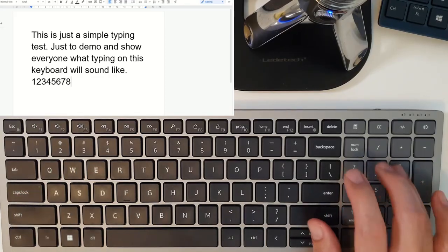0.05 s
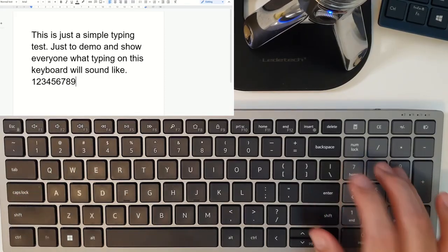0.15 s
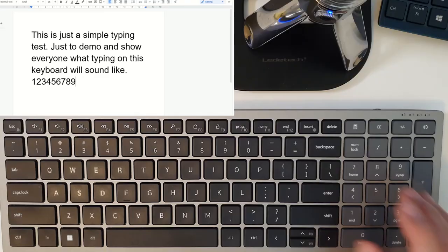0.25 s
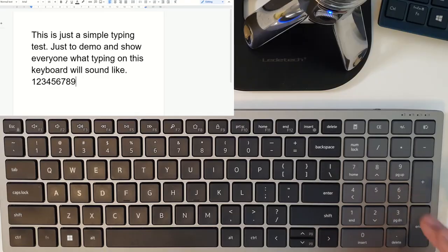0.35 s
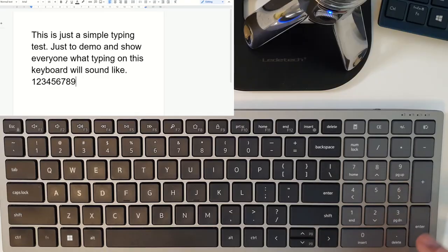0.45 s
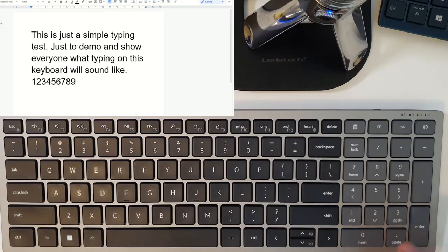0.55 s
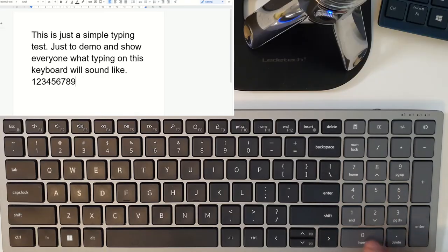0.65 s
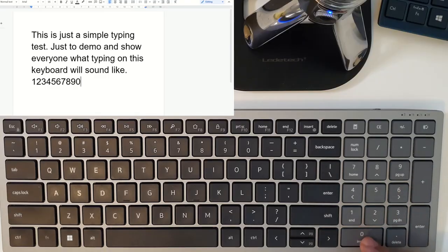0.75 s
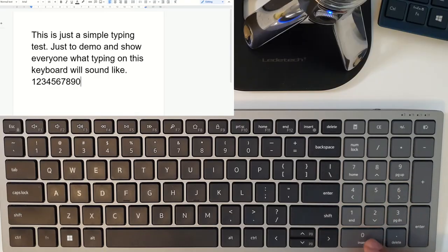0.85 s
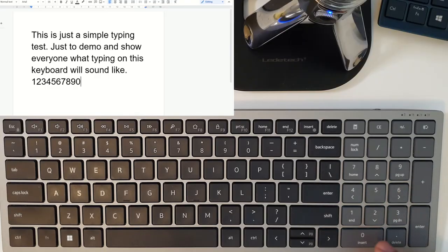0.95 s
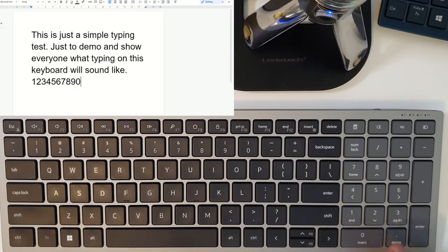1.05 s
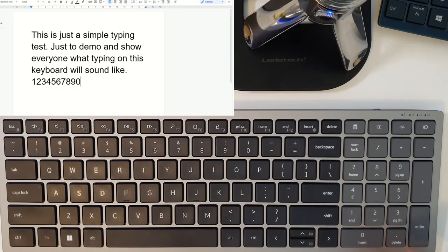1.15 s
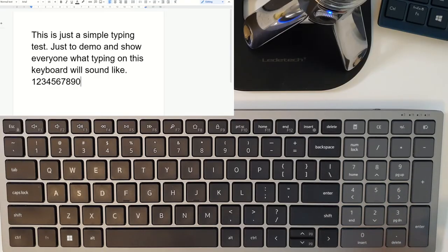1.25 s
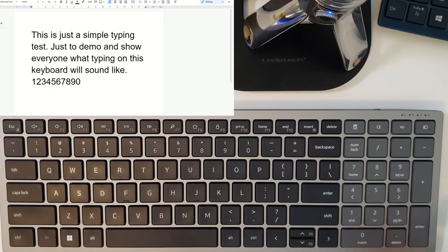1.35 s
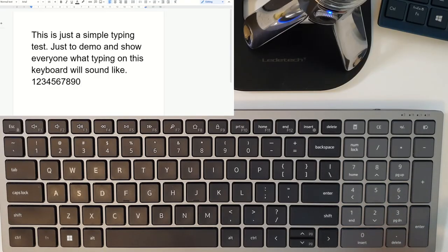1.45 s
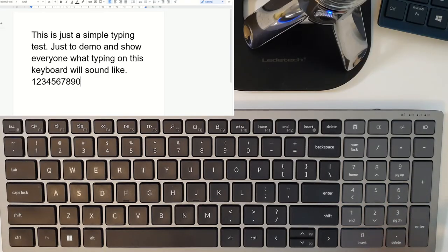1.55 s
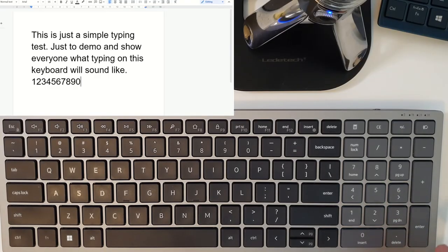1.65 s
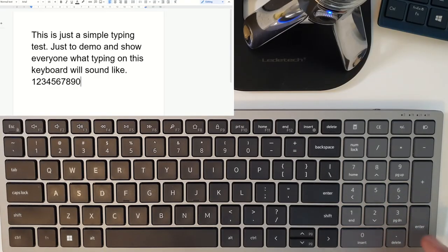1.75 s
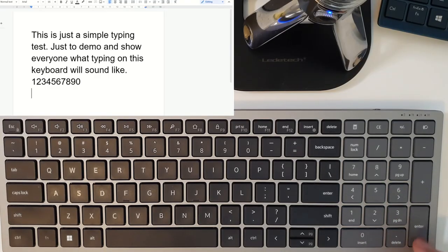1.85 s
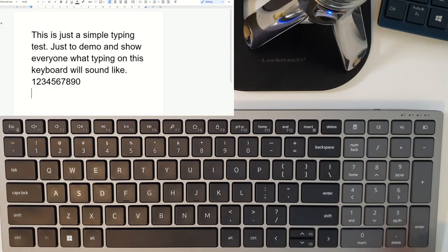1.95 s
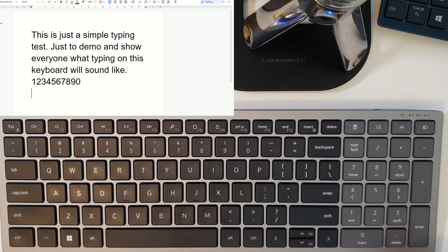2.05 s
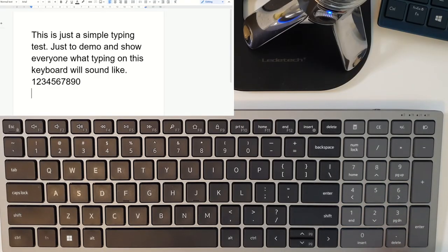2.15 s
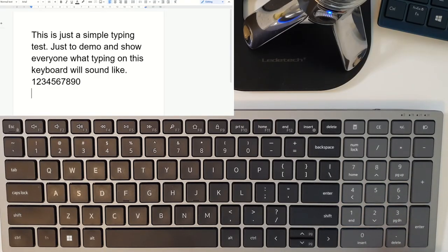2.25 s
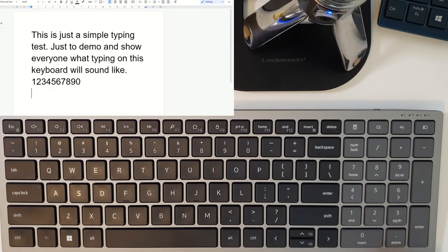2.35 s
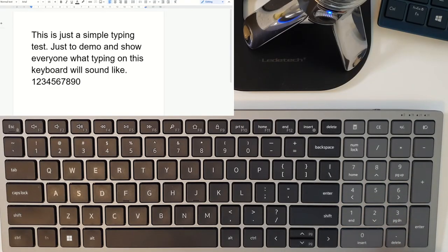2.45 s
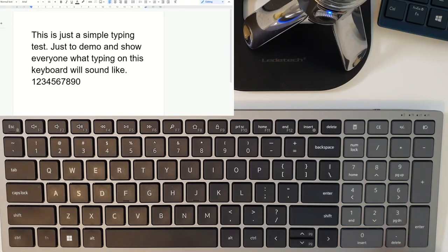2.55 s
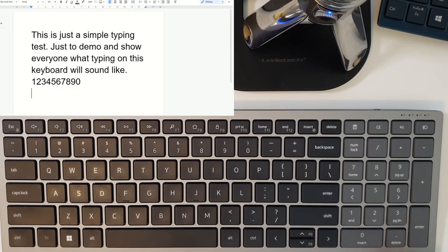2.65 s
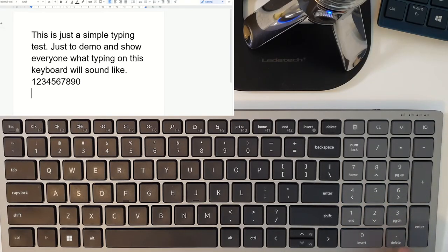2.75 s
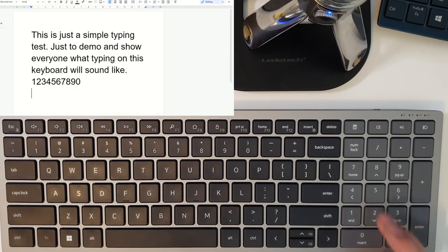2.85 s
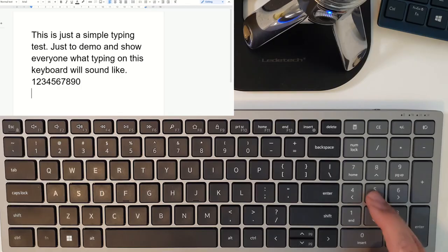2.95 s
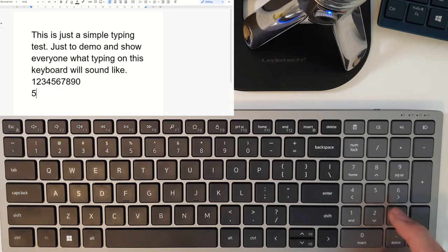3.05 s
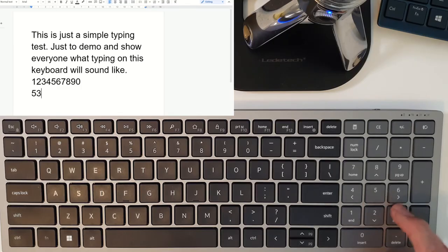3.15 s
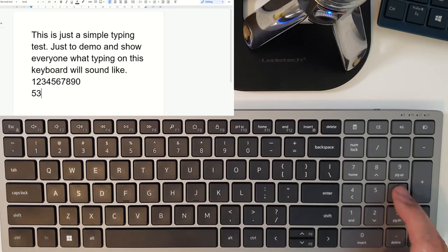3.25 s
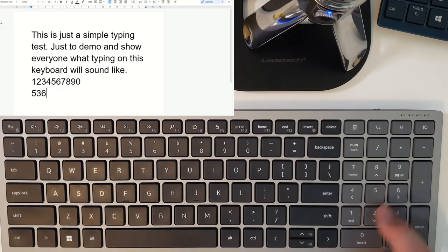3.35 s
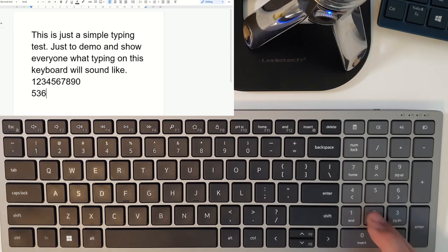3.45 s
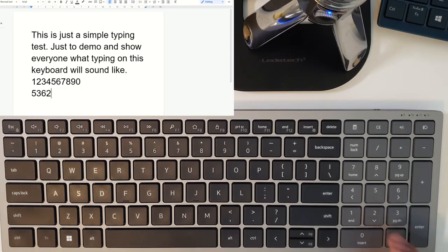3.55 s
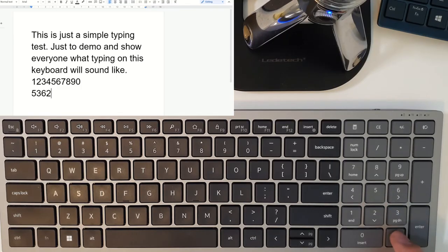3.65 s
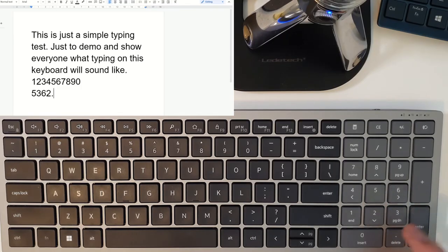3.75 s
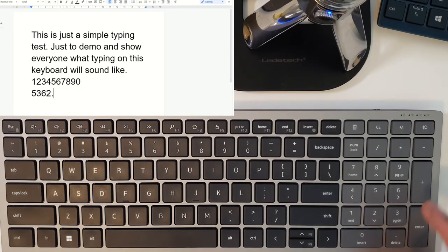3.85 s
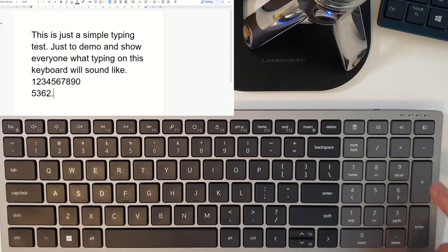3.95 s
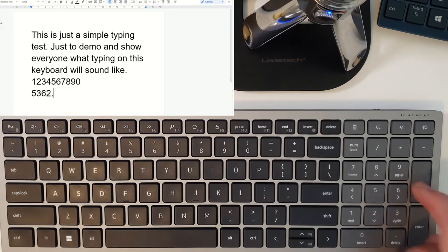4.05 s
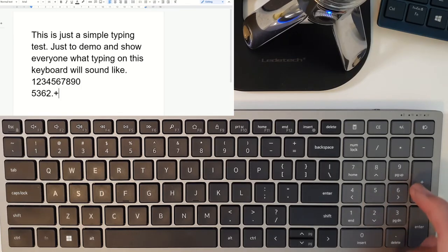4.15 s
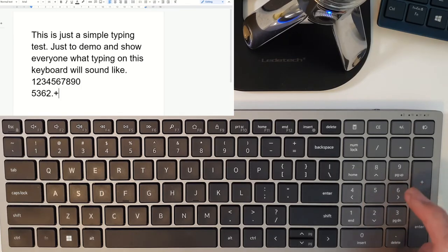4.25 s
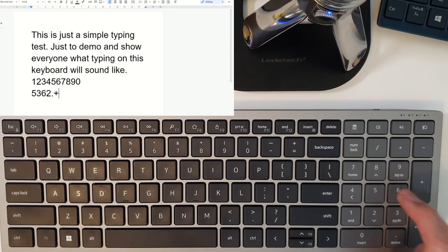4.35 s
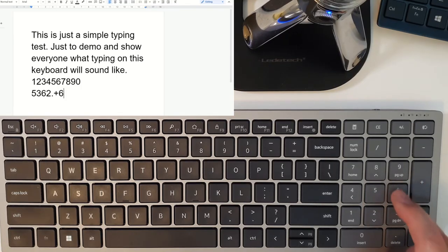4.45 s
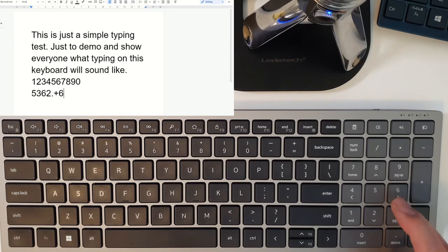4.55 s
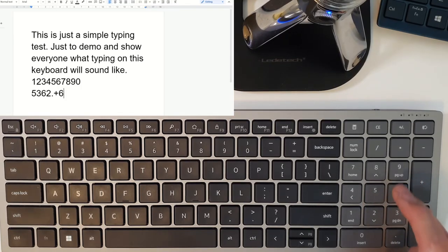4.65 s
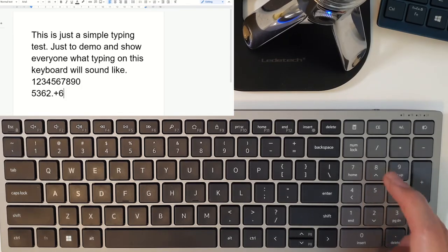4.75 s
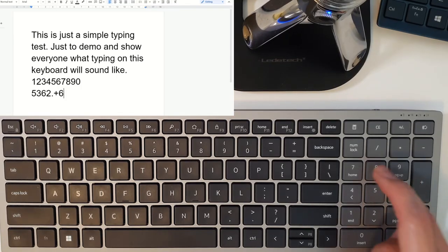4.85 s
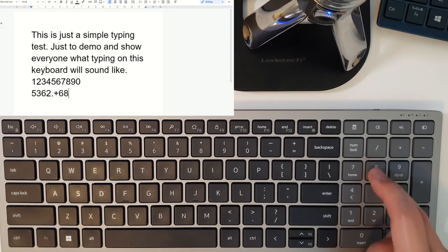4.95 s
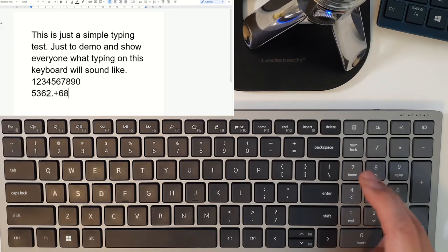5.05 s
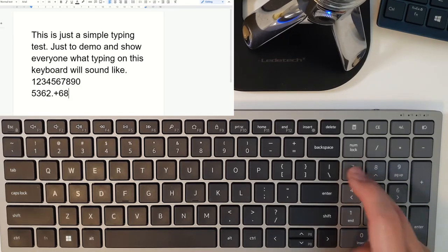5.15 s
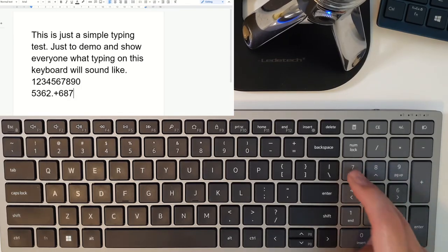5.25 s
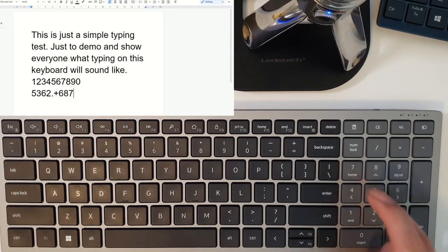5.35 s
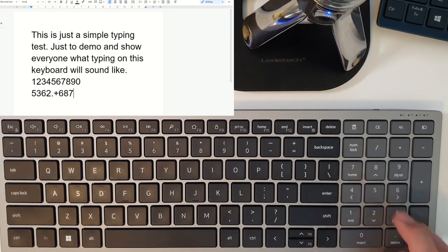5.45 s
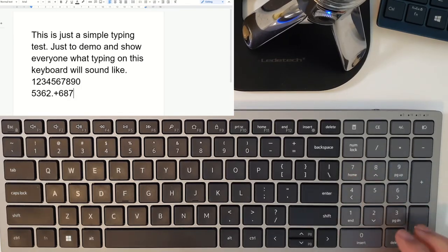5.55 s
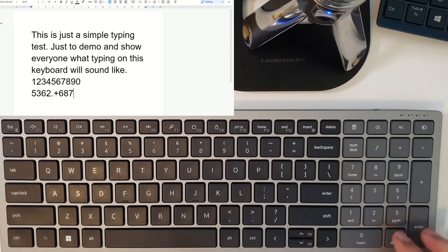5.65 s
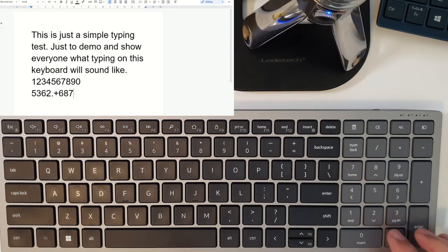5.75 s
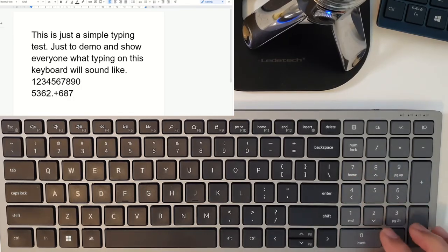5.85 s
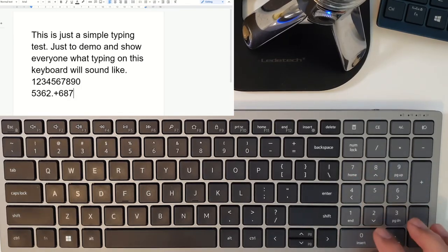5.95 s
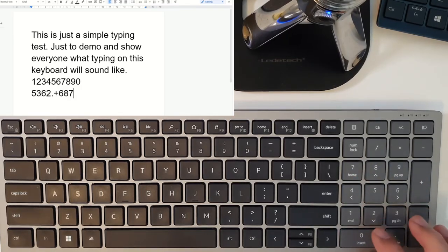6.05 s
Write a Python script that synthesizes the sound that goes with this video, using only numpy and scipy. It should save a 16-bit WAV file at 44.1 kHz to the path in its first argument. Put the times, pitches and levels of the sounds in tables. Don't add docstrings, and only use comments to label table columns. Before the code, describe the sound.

A small quiet room with faint steady hiss and low fan hum, heard from a microphone on the same desk as a slim keyboard. Very soft ticks and low bumps occur in the first 0.2 seconds. A firm plastic clack with a deep desk thump lands at 0.7, with a small release click at 0.84; another strong, brighter press comes at 1.8, released lightly at 1.9. After about a second of near silence, four quicker presses run at 2.95, 3.1, 3.3 and 3.4, growing softer. A duller thump follows at 3.6, then a loud, sharp, rattling clack at 4.1. Softer presses come at 4.4, 4.9 and 5.2, each with nail tick, bottoming clack, low boom and tiny lift click. Brief room wash trails each stroke. From about 5.3 to 6 only the low desk sway fades into hum and hiss.

```python
import sys
import numpy as np
from scipy import signal
from scipy.fft import rfft, irfft
from scipy.io import wavfile

SR = 44100
rng = np.random.default_rng(int(sys.argv[2]) if len(sys.argv) > 2 else 0)


def store_pcm(level_fs):
    pcm = np.round(np.clip(level_fs, -1, 1) * 32767).astype(np.int16)
    wavfile.write(sys.argv[1], SR, np.atleast_2d(pcm).T)


def volts_from_decibels(level):
    exponent = np.asarray(level, float) / 20
    return 10 ** exponent


N = 269010


def decay(age, t60):
    return np.exp(-np.log(1000) * age / t60)


def ring(modes, seconds, spread_db=0., swell_cycles=0.0053):
    t = np.arange(int(seconds * SR)) / SR
    out = np.zeros(len(t))
    spread_db = np.ravel(spread_db)
    for k, (hz, db, t60, *late_ms) in enumerate(modes):
        age = np.clip(t - sum(late_ms) / 1000, 0, None)
        swell = 1 - np.exp(-age * hz / swell_cycles)
        level = volts_from_decibels(db + spread_db[k % len(spread_db)])
        out += level * np.sin(2 * np.pi * hz * age) * decay(age, t60) * swell
    return out


def band(x, hz, q):
    return signal.lfilter(*signal.iirpeak(hz, q, SR), x)


def coloured(points, size):
    hz, db = np.transpose(points)
    f = np.fft.rfftfreq(size, 1 / SR) + 1
    gain = volts_from_decibels(np.interp(np.log(f), np.log(hz), db))
    x = irfft(rfft(rng.standard_normal(size)) * gain, size)
    return x / np.std(x)


def add(track, s, sound):
    i = int(s * SR)
    part = sound[max(-i, 0):N - i]
    track[max(i, 0):max(i, 0) + len(part)] += part


def peak(x, db):
    return x * volts_from_decibels(db) / np.max(np.abs(x))


def air():
    # frequency in Hz, density in dB per Hz.
    hiss = [(12, -46), (20, -6), (143, -4), (185, -17), (212, -11), (306, -14), (343, 0.5), (373, -10.5),
            (441, -6.5), (480, -19.5), (522, -16.5), (2130, -23.5), (4680, -32), (14800, -33.5),
            (16600, -32.5)]
    # centre in Hz, width in Hz, level in dB rms.
    fan = [(80, 10, -77.5), (218.2, 11, -83), (330.4, 24, -83.5), (442, 91, -88.5), (4740, 490, -85),
           (3430, 1060, -82)]
    # frequency in Hz, level in dB rms.
    whine = [(1001, -89), (2003, -93.5), (2998, -95.5), (4000, -100)]
    t = np.arange(N) / SR
    out = volts_from_decibels(-72) * coloured(hiss, N)
    for hz, width, db in fan:
        hum = band(rng.standard_normal(N), hz, hz / width)
        out += volts_from_decibels(db) * hum / np.std(hum)
    for hz, db in whine:
        out += volts_from_decibels(db) * np.sqrt(2) * np.sin(2 * np.pi * hz * t)
    return out


def desk():
    # start in seconds, then plate, panel, tray and feet levels in dB.
    presses = [(-.006, -45.5, -45.5, -65.5, -62), (.091, -45.5, -47.5, -70.5, -74),
               (.172, -44, -51.5, -65, -69), (.701, -31, -40, -61.5, -61), (1.809, -28, -36, -53, -49.5),
               (2.954, -34.5, -37, -54, -56.5), (3.114, -39.5, -38, -55.5, -52),
               (3.277, -42, -44, -69, -65), (3.424, -50, -44, -80, -77), (3.633, -31, -38.5, -59, -56.5),
               (4.082, -28.5, -35.5, -52, -43), (4.416, -36, -37, -45.5, -47.5),
               (4.906, -34.5, -37.5, -51.5, -56), (5.195, -36.5, -36, -47.5, -48.5)]
    # start in seconds, plate and panel levels in dB.
    lifts = [(0.84, -59, -57.5), (1.896, -64, -48), (3.022, -51, -53), (3.19, -55, -59),
             (3.342, -50.5, -53.5), (3.494, -48, -57), (3.707, -62, -63), (4.158, -48.5, -66),
             (4.201, -67, -53), (4.487, -48.5, -83), (4.971, -51, -47.5), (5.259, -46, -46.5)]
    # start in seconds, level in dB.
    pushes = [(-.006, -63), (0.174, -55.5), (0.699, -37), (.839, -52), (1.819, -38), (2.956, -38.5),
              (3.114, -41), (3.276, -56), (3.433, -42.5), (3.633, -37.5), (4.086, -39), (4.416, -41.5),
              (4.906, -39.5), (5.193, -39.5)]
    # frequency in Hz, level in dB, t60 in seconds, arrival in ms.
    plate = [(123, -12, 0.076, 5), (148.1, -1, 0.16, 6.68), (178.9, 6, 0.087, 2.1),
             (215.4, -13, 0.25, 2.86)]
    panel = [(70.6, -13.5, 0.26, 7.26), (85.92, 4.5, 0.26, 7.43), (90.6, -4.5, 0.41, 4.87),
             (107.4, -16.5, 0.44, 6.94)]
    tray = [(250.4, -10, 0.11, 4.24), (290, -11, 0.15, 2.85)]
    feet = [(348.2, 2, 0.15, 4.94), (410.5, 2, 0.1, 2.99), (488, -1, 0.031, 0.77)]
    sway = [(25.69, -1, 1.45, 4.25), (29.52, -9.5, 0.77, 18.6), (32.72, -14.5, 0.99, 10.3),
            (47.8, -9, 0.98, 6.5)]

    shakes = list(presses)
    for s, plate_db, panel_db in lifts:
        rattle_db = max(plate_db, panel_db) - 22.5
        shakes.append((s, plate_db, panel_db, rattle_db, rattle_db))
    s, plate_db, panel_db, tray_db, feet_db = np.transpose(shakes)
    push_s, push_db = np.transpose(pushes)
    # modes, starts in s, levels in dB, spread in dB, swell in cycles
    families = [(plate, s, plate_db, 3.0, .5),
                (panel, s, panel_db + 4.5, 2.5, 1.2),
                (tray, s, tray_db + 4, 2.5, 1.5),
                (feet, s, feet_db + 4, 2.5, 1.5),
                (sway, push_s, push_db, .3, .3)]
    push = np.hanning(int(0.0022 * SR))
    out = np.zeros(N)
    for modes, times, levels, spread_db, swell_cycles in families:
        seconds = 1.3 * max(mode[2] for mode in modes)
        spots = rng.standard_normal((len(times), len(modes)))
        for when, db, spot in zip(times, levels, spots):
            body = np.convolve(ring(modes, seconds, spread_db * spot, swell_cycles), push)
            add(out, when, -peak(body, db))
    return out


def contact(dice, hz, db, q, ring_gain, t60, ms):
    ms = ms * volts_from_decibels(-0.19 * (db + 24))
    t = 1000 * np.arange(len(dice)) / SR / ms
    chatter = dice * np.abs(dice) * np.exp(-t) * np.minimum(t / 0.19, 1)
    cap = ring_gain * ring([(hz, 0, t60)], .03)
    cap[0] += 1
    struck = np.convolve(chatter, cap)
    return peak(band(band(struck, hz, q), hz, q), db)


def keys():
    # start in seconds, tick in dB, clack in dB, clack in Hz, case knock in dB.
    landings = [(0.0724, -51, -54, 4200, -61), (.1723, -55, -55, 3800, -58.5),
                (0.7013, -56, -21.5, 4790, -30), (1.8101, -28.5, -36.5, 3740, -32),
                (2.9533, -47, -37, 2740, -42.5), (3.1135, -51, -43.5, 3260, -46),
                (3.2768, -53, -53, 3450, -48.5), (3.4304, -66, -62, 5560, -56),
                (3.6338, -36.5, -39.5, 2590, -40), (4.0841, -32.5, -25, 4830, -33.5),
                (4.4138, -52, -50, 2850, -50), (4.914, -64, -46, 2940, -44.5),
                (5.1924, -42.5, -42.5, 2420, -34)]
    # start in seconds, level in dB, frequency in Hz.
    pings = [
        (.0735, -57.5, 9150),
        (.161, -66, 8550),
        (.1812, -60, 8350),
        (2.9484, -51, 8200),
        (3.2665, -64, 8600),
        (3.417, -61.5, 8460),
    ]
    # start in seconds, tick, clack and case knock in dB.
    bounces = [(0.085, -65, -76, -62), (.1816, -63, -65, -63), (0.7056, -48, -59, -41),
               (0.845, -65, -66, -51.5), (1.813, -37, -40, -47.5), (1.8192, -49, -72, -65),
               (2.9553, -64, -45, -53), (3.1276, -73, -62, -65), (4.0861, -36, -29, -34),
               (4.0945, -55, -48, -57), (4.104, -58, -49, -76), (4.418, -62, -50, -44.5),
               (5.2017, -60, -54, -40)]
    # start in seconds, tick in dB, tick in Hz, clack in dB, case knock in dB.
    touches = [(.161, -69, 8770, -75, -70), (.167, -57, 10200, -69, -79), (0.6957, -41, 8500, -46, -51),
               (.8313, -65, 6350, -70, -78), (0.8367, -58, 7560, -62, -50), (1.8054, -31.5, 9100, -62, -43),
               (2.9489, -43.5, 8200, -44, -44.5), (3.106, -61, 11280, -46, -59),
               (3.2665, -70, 8500, -80, -78), (3.2698, -48.5, 11500, -56, -58),
               (3.4172, -67, 8400, -70, -75), (3.6268, -46, 6900, -45, -51), (4.0801, -38, 8050, -56, -51),
               (4.4097, -48.5, 10500, -52, -51), (4.9052, -35, 8000, -56, -41.5),
               (5.188, -42, 8900, -47, -53)]
    # start in seconds, tick in dB, clack in dB, clack in Hz, case knock in dB.
    returns = [(0.8414, -49, -47.5, 5050, -57), (1.896, -44.5, -66, 5500, -71),
               (3.0176, -63, -59, 3900, -66), (3.1893, -62, -53.5, 6000, -64), (3.34, -57, -56, 5800, -63),
               (3.5002, -54, -61, 3850, -67), (3.7054, -58, -54, 2720, -66), (4.1577, -53, -55, 3000, -54),
               (4.4878, -50.5, -40, 4050, -57.5), (4.9716, -52.5, -53, 6100, -58),
               (5.2584, -53.5, -53, 2600, -57)]
    # start in seconds, tick in dB.
    brushes = [(1.892, -62), (3.183, -68), (3.322, -58), (3.332, -61), (3.492, -63), (4.436, -62),
               (4.48, -65), (4.9532, -58), (5.239, -57), (5.252, -61)]
    # frequency in Hz, level in dB, t60 in seconds, arrival in ms.
    case = [(587, -10, 0.02, 1.1), (781, -15.5, 0.03, 1.1), (962, -5.5, 0.025, 1.03),
            (1279, 7, 0.013, 0.89), (1750, -5.5, 0.024, 0.45), (2027, -3, 0.02, 0.34),
            (2693, -0.5, 0.023, 0.35)]
    # frequency in Hz, level in dB, t60 in seconds.
    deck = [(2590, 4, 0.016), (3450, 4, 0.011), (4630, 0, 0.0098), (5180, 4, 0.016), (6200, -12, 0.014)]
    # breadth as Q, ring gain, ring t60 in seconds, chatter in ms.
    thin_wall = (0.96, 0.07, 0.0014, 1.08)
    thick_wall = (1.11, 0.15, 0.0051, 1.56)

    contacts = [(s, tick, hz, clack, 4600, knock) for s, tick, hz, clack, knock in touches]
    contacts += [(s, tick, 6900, clack, hz, knock) for s, tick, clack, hz, knock in landings]
    contacts += [(s, tick, 8200, clack, 2930, knock) for s, tick, clack, knock in bounces]
    contacts += [(s, tick, 7600, clack, hz, knock) for s, tick, clack, hz, knock in returns]
    contacts += [(s, tick, 10100, tick - 10.5, 3750, tick - 5) for s, tick in brushes]

    out = np.zeros(N)
    thud = np.hanning(int(0.00051 * SR))
    for s, tick_db, tick_hz, clack_db, clack_hz, knock_db in contacts:
        tick_dice, clack_dice = rng.standard_normal((2, 400))
        add(out, s, contact(tick_dice, tick_hz, tick_db + 0.5, *thin_wall))
        add(out, s, contact(clack_dice, clack_hz, clack_db - 5.0, *thick_wall))
        deck_ring = ring(deck, .03, -7 * rng.standard_normal(len(deck)))
        add(out, s, peak(np.convolve(clack_dice[:60] ** 3, deck_ring), clack_db - 7))
        case_ring = ring(case, .06, 1.5 * rng.standard_normal(len(case)))
        late_s = 0.00105
        add(out, s + late_s, peak(np.convolve(thud, case_ring), knock_db))
    for s, db, hz in pings:
        add(out, s, peak(ring([(hz, 0, 0.0074)], .03, swell_cycles=2.8), db))
    return out


def linger():
    # start in seconds, wash in dB rms, shiver in Hz, shiver in dB relative to the wash, shiver Q.
    washes = [(.075, -64.5, 3860, -14, 3.7), (.179, -66.5, 8200, -8, 11), (.703, -55, 4580, -6, 3.2),
              (0.842, -66, 7200, -9, 4), (1.810, -55, 7600, -8.5, 1.8), (1.894, -69, 7700, 8, 5.1),
              (2.955, -57.5, 7940, -18, 16), (3.112, -60.5, 3250, -12, 2), (3.279, -65, 5940, -15, 3),
              (3.428, -64, 5500, -25, 3), (3.501, -67, 5000, -20, 3), (3.636, -57.5, 5850, -22, 3.2),
              (4.088, -54.5, 4260, -7, 0.95), (4.418, -62, 7900, -12, 6.1), (4.488, -63.5, 4100, -10, 3.2),
              (4.904, -58.5, 7540, -16, 3), (5.193, -58, 6200, -25, 3), (5.261, -64.5, 5000, -26, 3)]
    # frequency in Hz, density in dB per Hz.
    tail = [(290, 13), (500, 8.5), (799, -7), (1200, 5), (1870, -1), (2130, -1.5), (4780, -3.5), (5950, -4),
            (13900, -10.5), (15900, -31), (16600, -41)]
    out = np.zeros(N)
    age = np.arange(int(.4 * SR)) / SR
    lowpass = signal.butter(2, 5600, fs=SR, output="sos")
    rise = 1 - np.exp(-1000 * age / 0.79)
    for s, db, hz, shiver_db, q in washes:
        t60 = max(0.11 + 0.0315 * (db + 66), .08)
        wash = coloured(tail, len(age))
        dull = signal.sosfilt(lowpass, wash)
        treble = wash - dull
        shiver = band(band(rng.standard_normal(len(age)), hz, q), hz, q)
        shiver *= volts_from_decibels(shiver_db) / np.std(shiver)
        steps_db = rng.standard_normal(len(age) // 60 + 1)
        crackle = volts_from_decibels(np.repeat(steps_db, 60)[:len(age)])
        sound = (dull + shiver) * decay(age, t60) + treble * decay(age, 0.57 * t60)
        add(out, s, volts_from_decibels(db) * sound * crackle * rise)
    return out


def scene():
    return (keys() + linger() + desk() + air())[None]


def roll_off(x):
    return signal.sosfilt(signal.butter(12, 16760, fs=SR, output="sos"), x)


def record(dry):
    top = signal.ellip(8, .3, 12, 15800, fs=SR, output="sos")
    return roll_off(signal.sosfilt(top, dry))


dry = scene()
out = record(dry)
store_pcm(out)
```